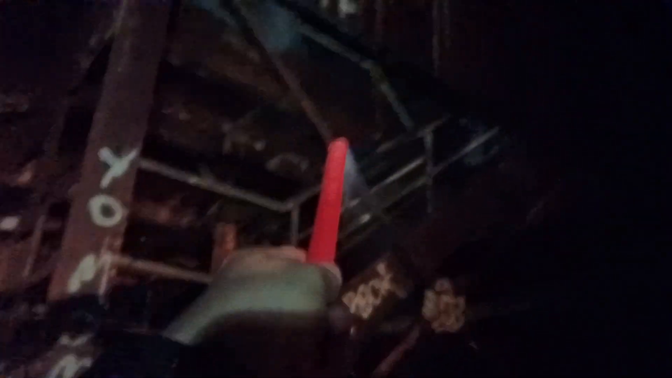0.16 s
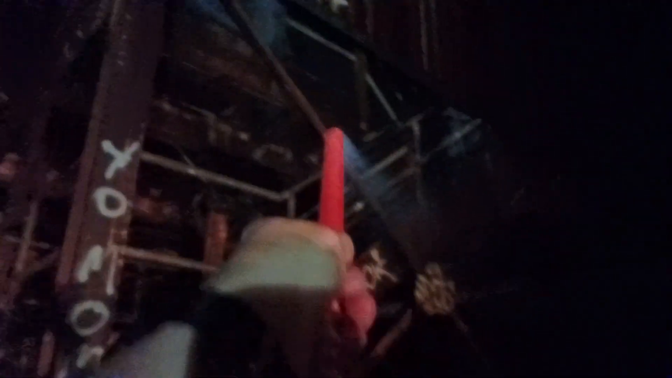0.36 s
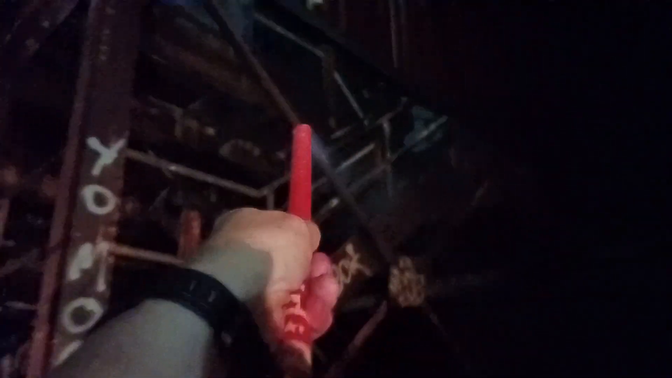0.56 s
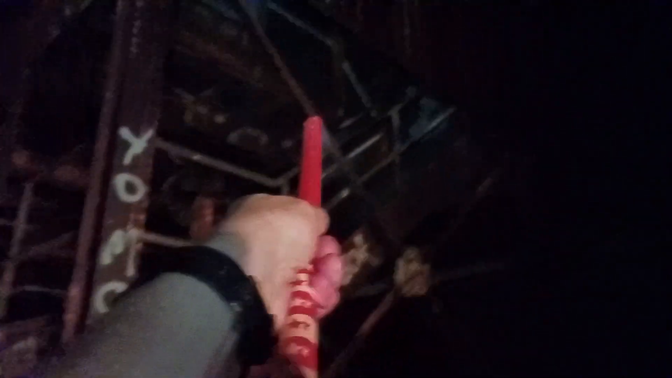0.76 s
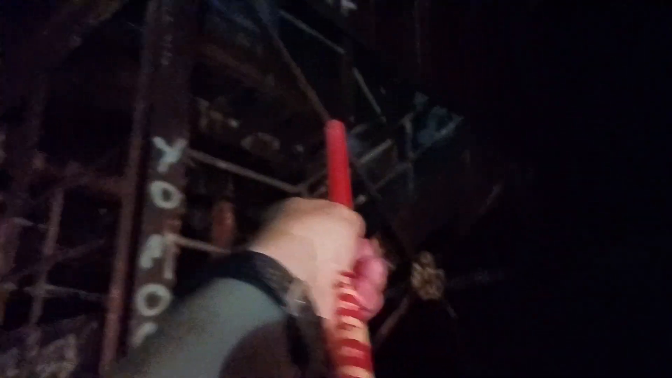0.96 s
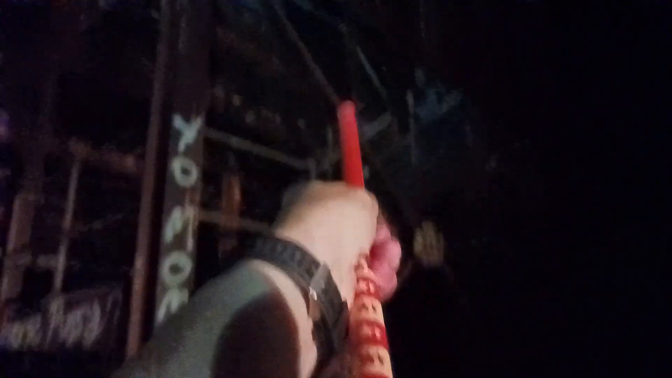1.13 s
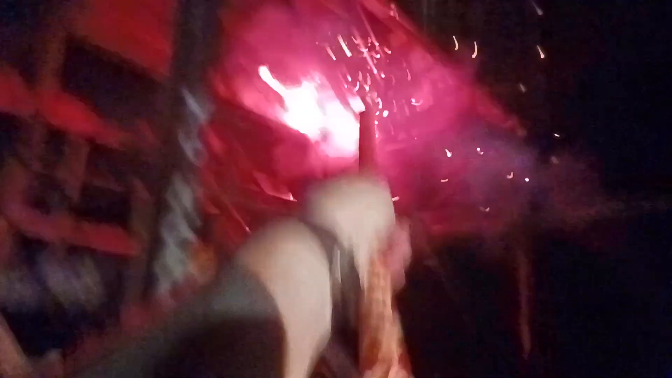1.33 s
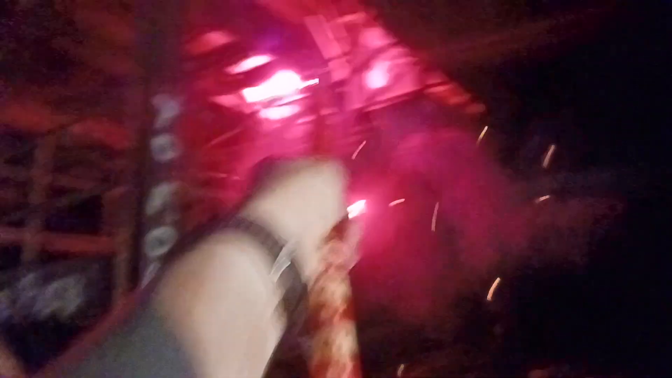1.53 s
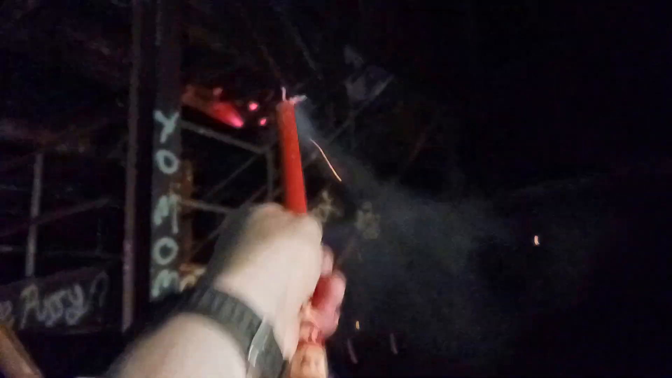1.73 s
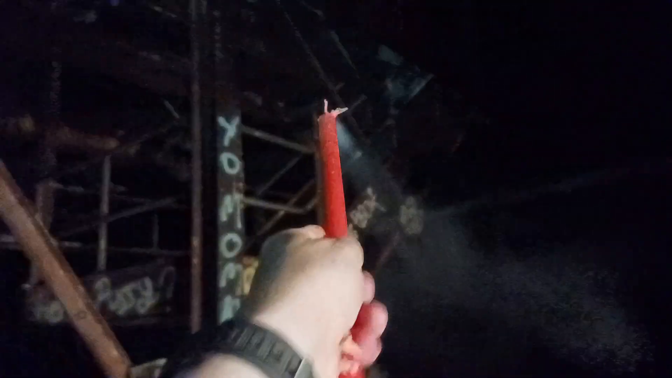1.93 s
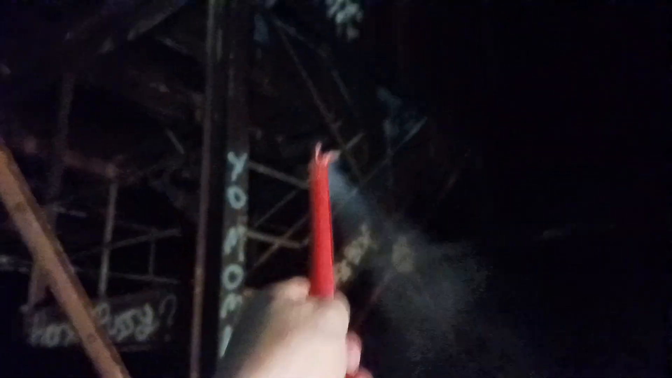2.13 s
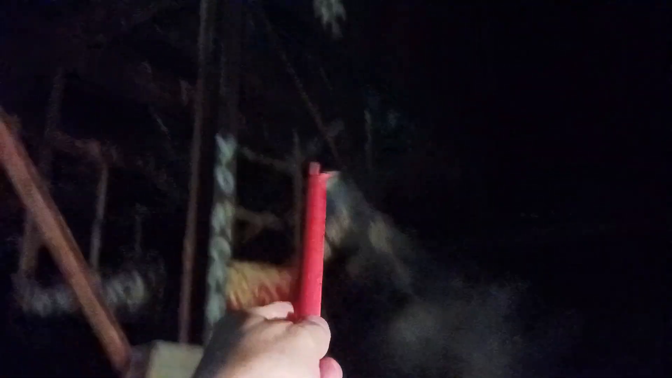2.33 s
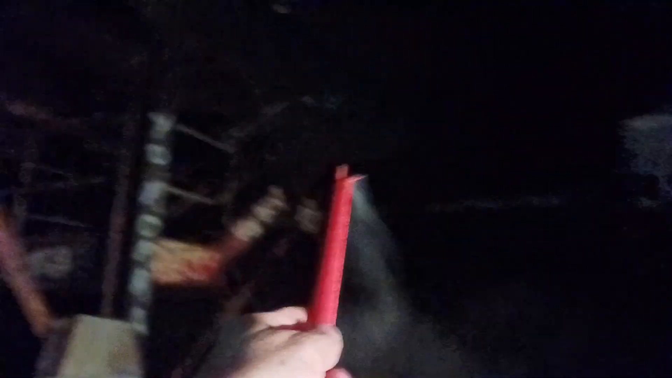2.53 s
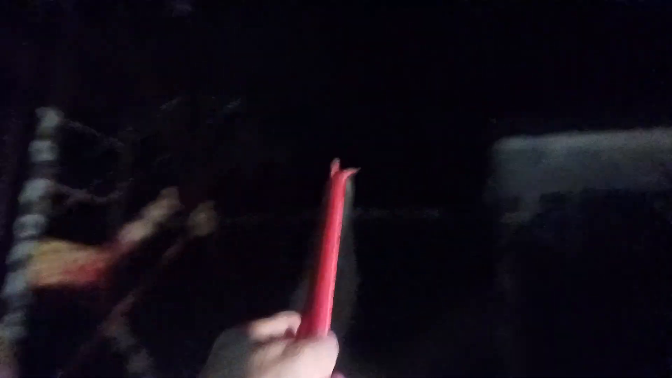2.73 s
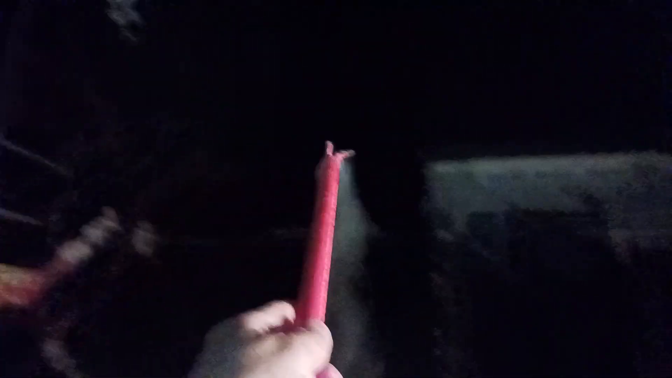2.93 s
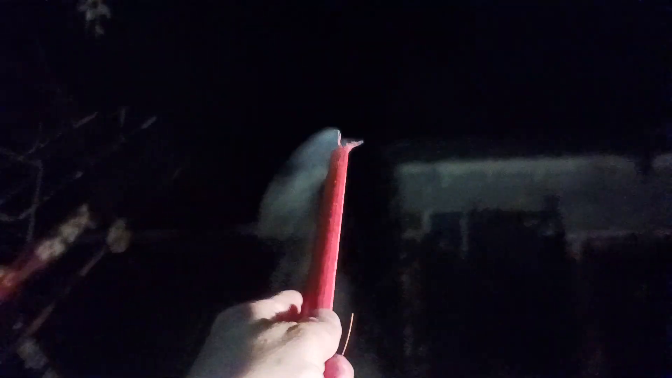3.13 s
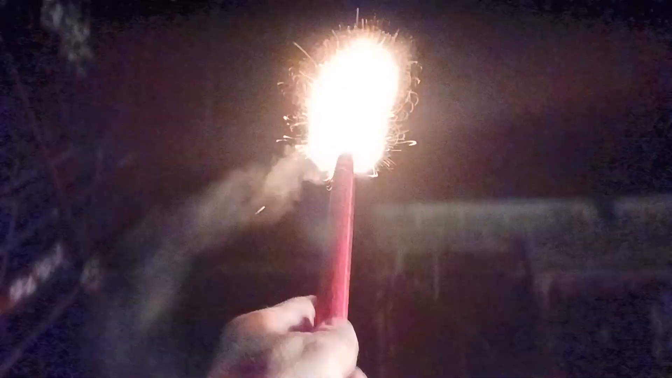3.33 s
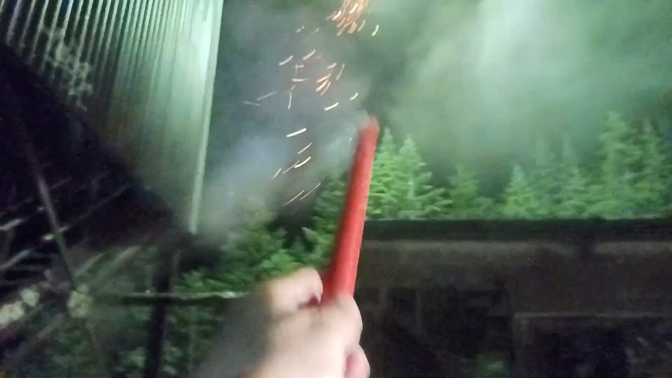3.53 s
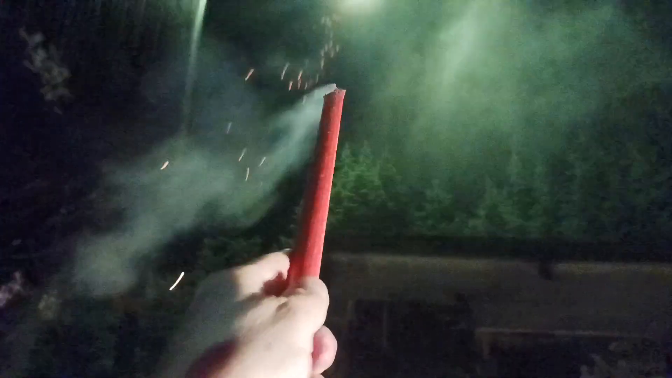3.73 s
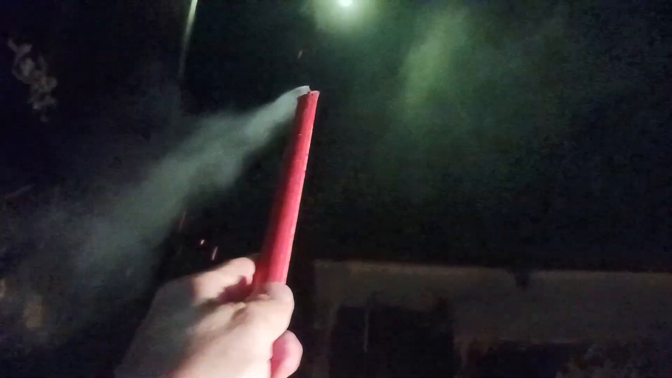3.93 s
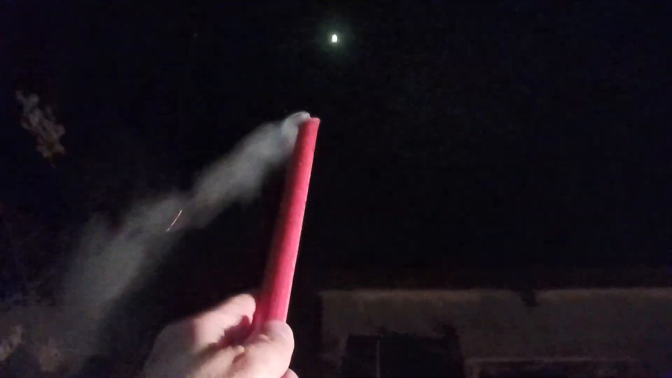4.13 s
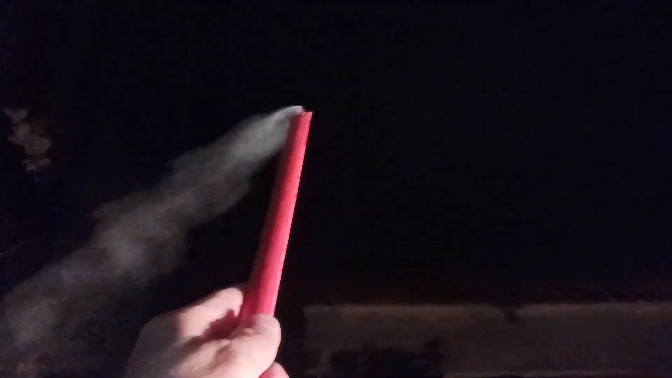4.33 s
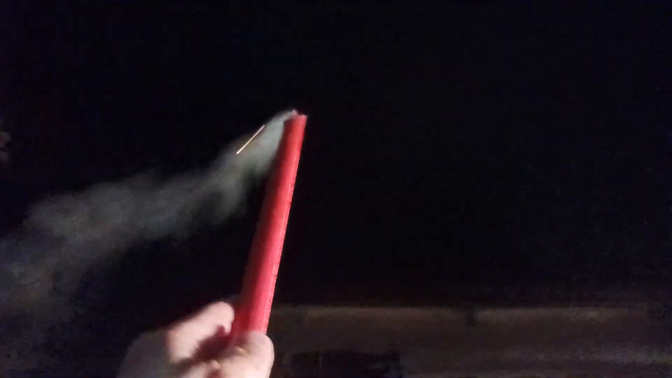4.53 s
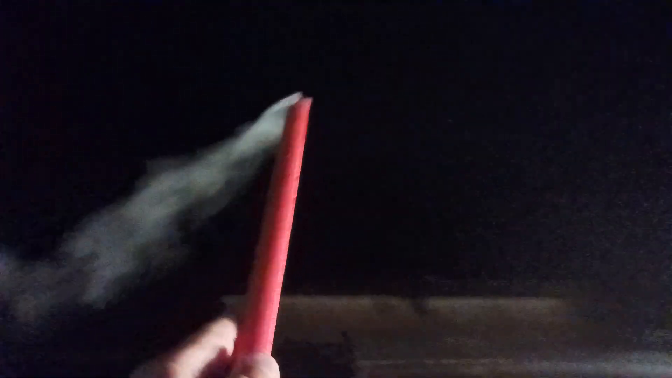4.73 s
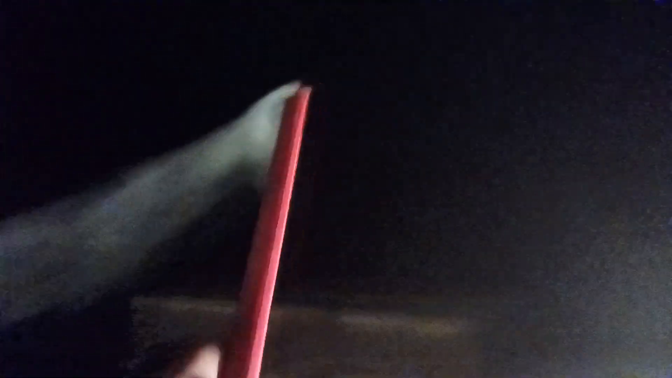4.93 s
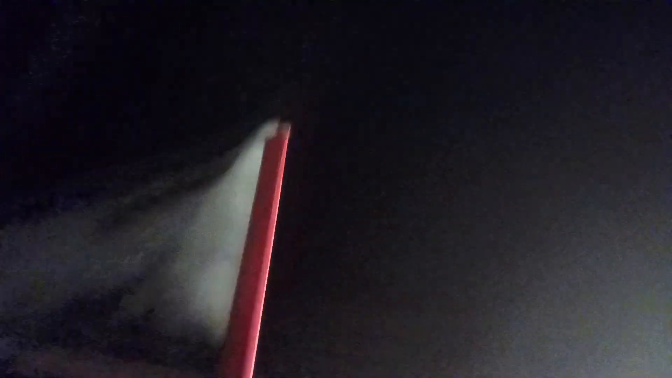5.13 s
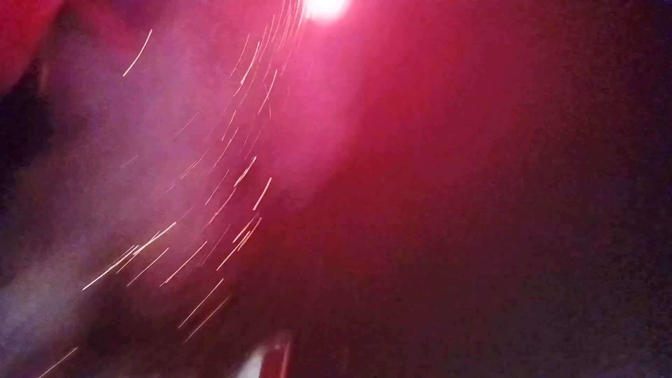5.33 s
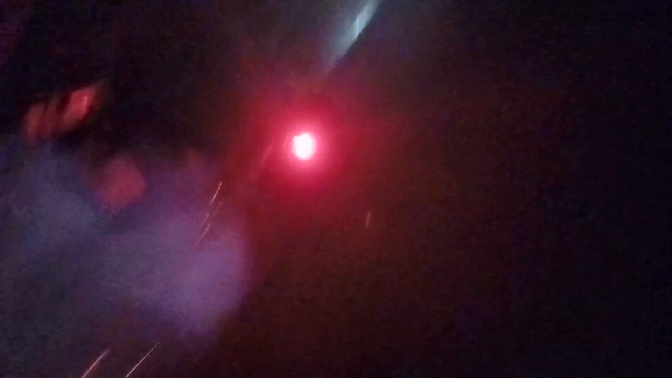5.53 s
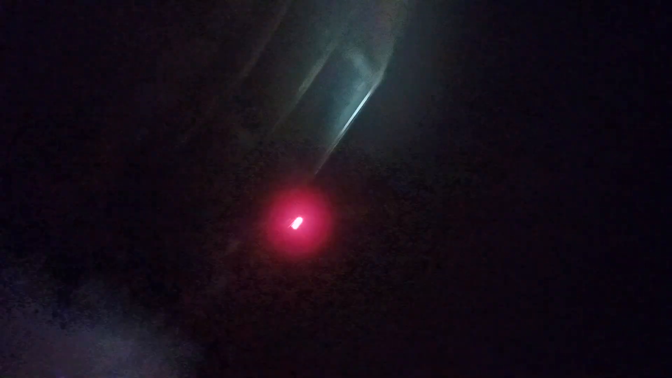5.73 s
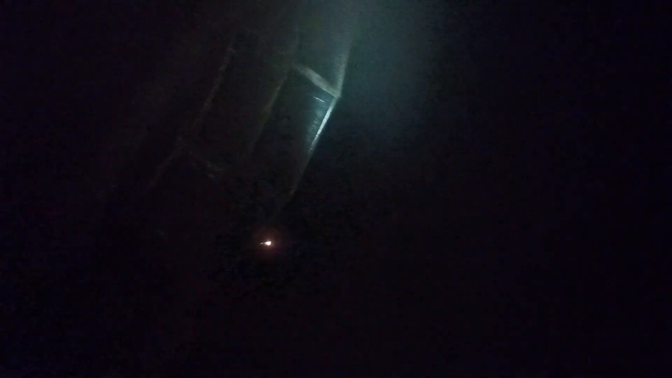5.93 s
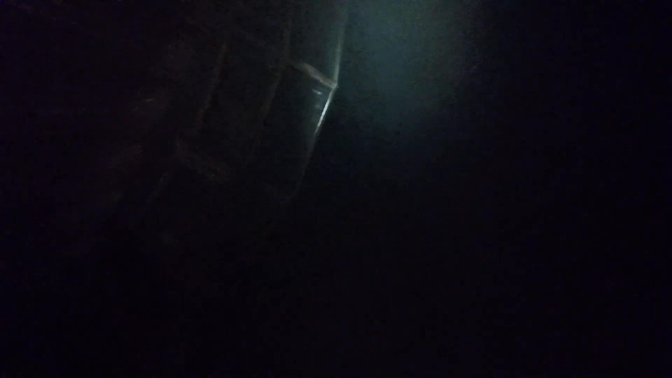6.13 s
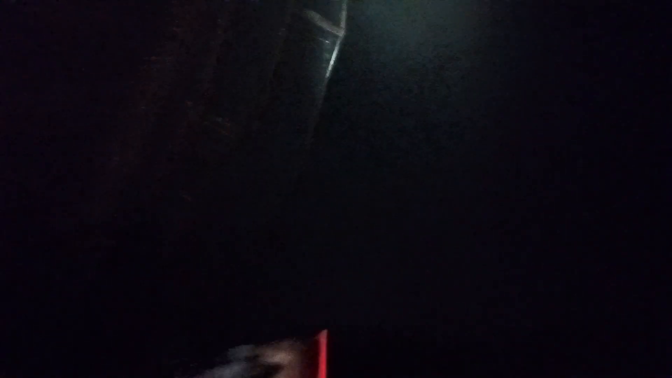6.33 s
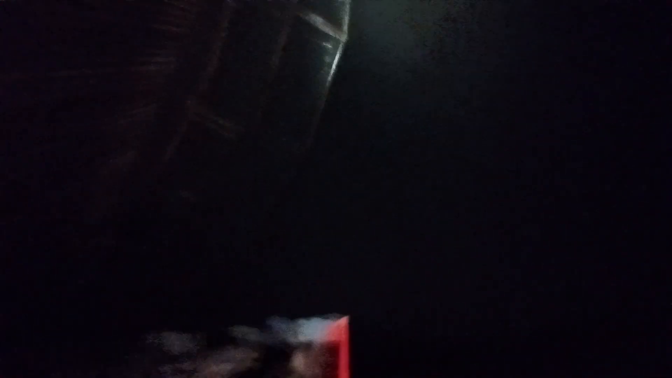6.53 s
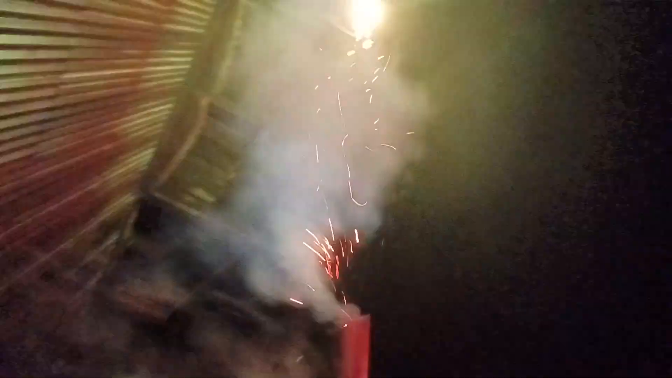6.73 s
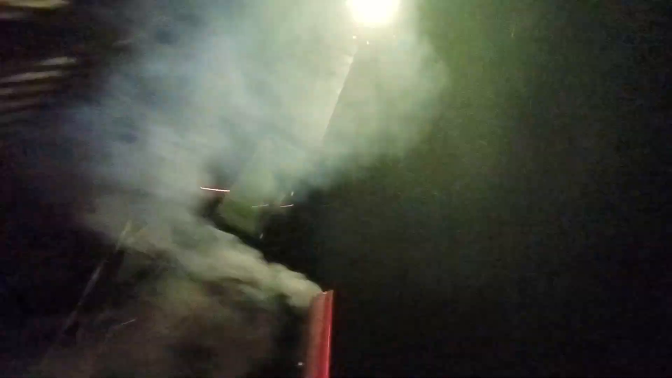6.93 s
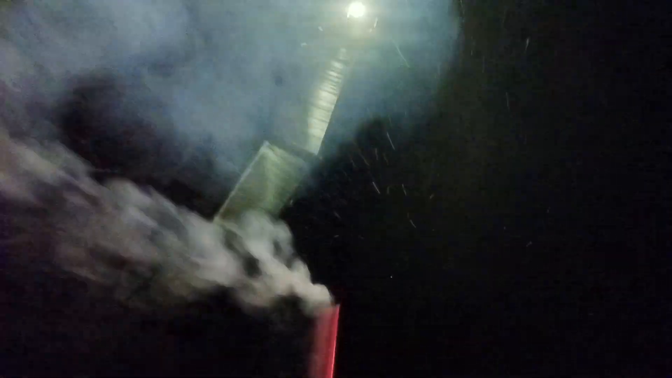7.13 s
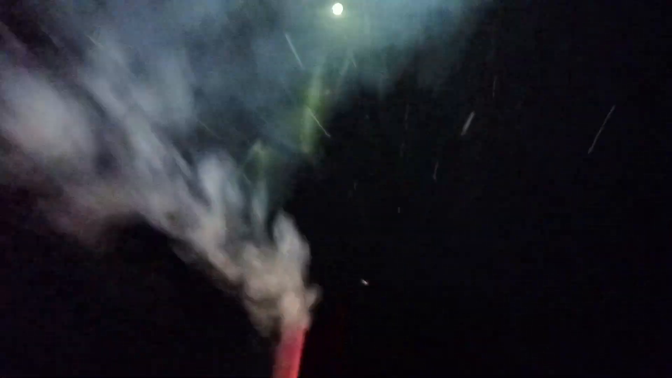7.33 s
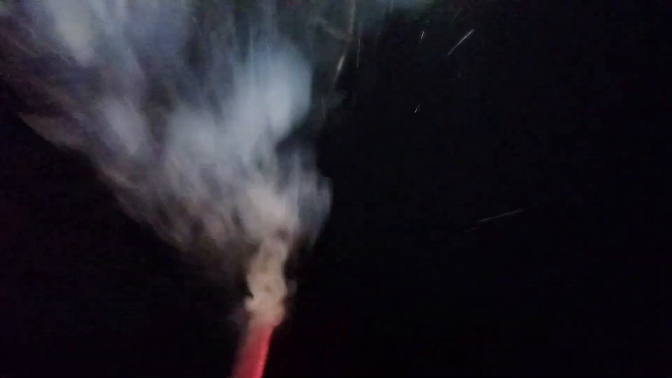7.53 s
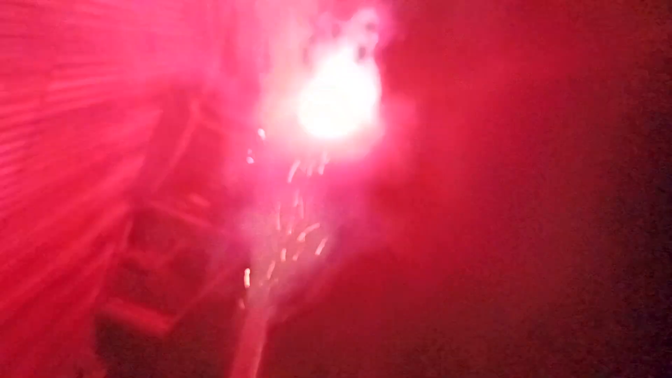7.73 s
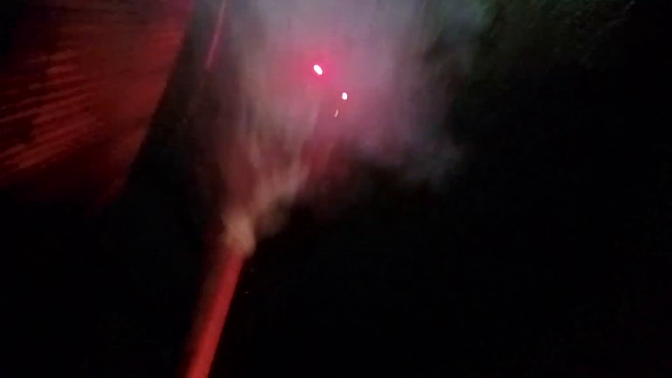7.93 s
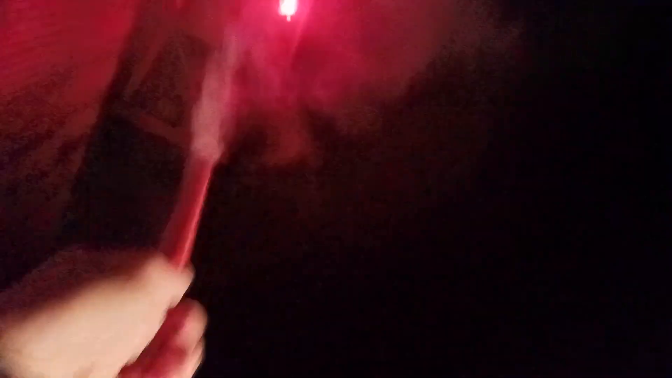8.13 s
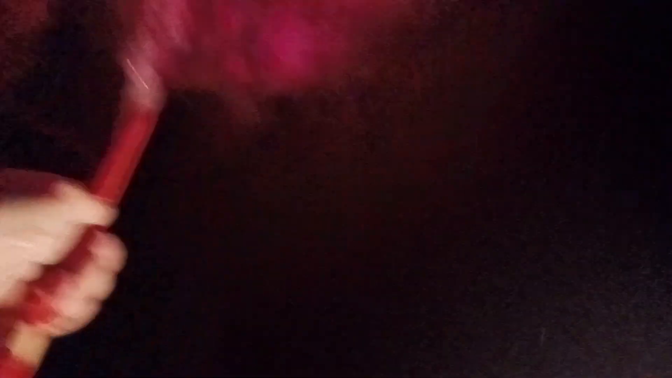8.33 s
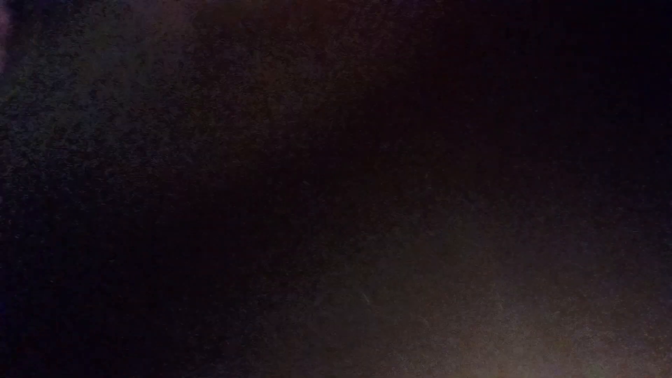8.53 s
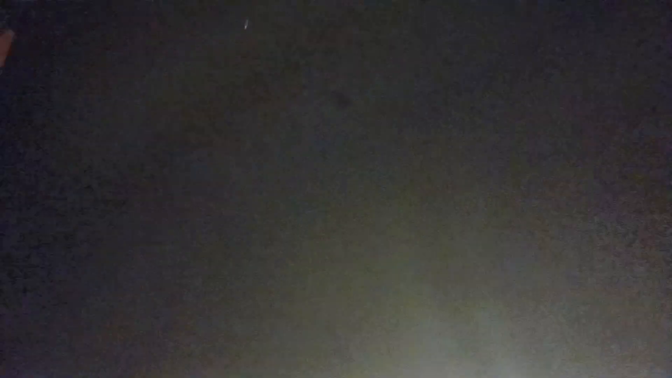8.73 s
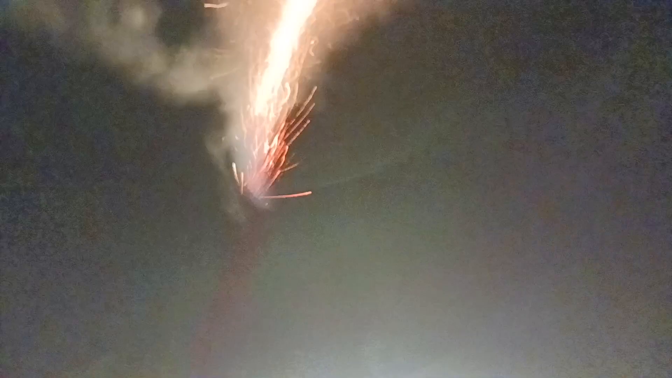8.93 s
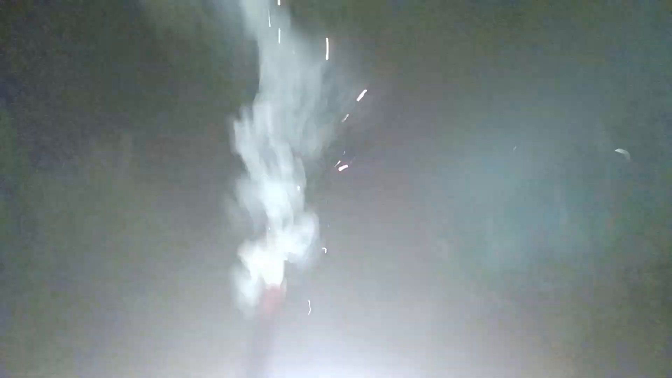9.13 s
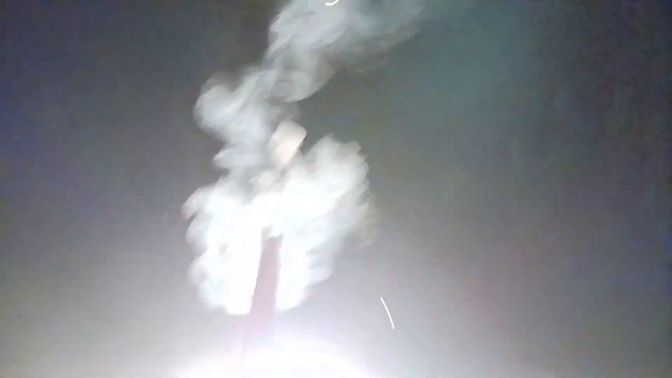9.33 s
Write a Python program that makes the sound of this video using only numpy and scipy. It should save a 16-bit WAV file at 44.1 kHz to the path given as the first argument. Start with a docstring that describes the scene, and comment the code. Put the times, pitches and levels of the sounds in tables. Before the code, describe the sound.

Six spaced firework shots crack and roar close by over fizzing fuse gas, with short boomy echoes and low wind rumble at the start.

```python
"""Wind buffets both microphone ports at first and dies down, over a faint machine hum in the night air.
Close by, a hand-held firework tube hisses fuse gas and fires six stars among steel frames and sheds.
Each shot is a snap and a noise roar; sheet walls throw it back as short puffs, a dying wash and a boom.
One star bursts nearby with a thin crack and a slap. Wind, hiss and hum are coloured noise, the hum with
one steady tone; a few scuffs and small metal knocks sit near the microphone."""
import sys
import numpy as np
from scipy import signal
from scipy.fft import rfft, irfft, next_fast_len
from scipy.io import wavfile
from scipy.ndimage import uniform_filter1d, map_coordinates

SR = 44100
rng = np.random.default_rng(int(sys.argv[2]) if len(sys.argv) > 2 else 0)


def master_out(mix):
    """Clip the mix to full scale and print it as 16-bit PCM to the path in sys.argv[1]."""
    frames = np.transpose(np.atleast_2d(mix))
    ceiling = np.clip(frames, -1, 1)
    pcm = np.round(ceiling * 32767).astype(np.int16)
    wavfile.write(sys.argv[1], SR, pcm)


N = 413658  # samples

# the tube's whine, far machinery's drone and hum: start_s, whine_db, drone_db, hum_db
NIGHT_LEVELS = [(0, -62, -57, -60), (.3, -57, -62, -65), (.5, -61, -63, -55.5), (1.1, -64, -64, -60),
                (1.22, -81, -64, -67), (3.35, -64.5, -74, -80), (5.2, -68.5, -79, -90),
                (6.6, -74.5, -70, -90), (7.6, -67, -62, -87), (8.9, -64.5, -57, -90), (9.4, -65, -60, -80)]
# noise bands of the whine, then of the low drone: pitch_hz, width_hz, level_db
NIGHT_TONES = [
    [(1112, 33, 1), (377, 31, -3), (187.3, 7.4, -4.5)],
    [(49.7, 6.6, 2.5)],
]
# wind pressing on the ports: start_s, strength_db
WIND_STRENGTH = [(0, -32.5), (.31, -29.5), (.53, -36.5), (.62, -25), (.75, -22.5), (.92, -24.5),
                 (1.04, -21), (1.17, -21.5), (1.2, -41), (1.24, -36), (1.5, -36), (1.73, -49),
                 (1.94, -44.5), (2.04, -42.5), (2.21, -47.5), (2.31, -39.5), (2.48, -45.5), (2.65, -37.5),
                 (2.84, -42.5), (3.1, -50.5), (3.38, -53.5), (3.55, -45.5), (3.75, -57.5), (4.19, -63),
                 (4.55, -75.5), (4.75, -68), (5.2, -59.5), (5.82, -70), (5.9, -89), (6.4, -80),
                 (6.6, -72.5), (8.0, -68), (9.38, -63)]
# single buffets on a port: start_s, peak_db, left_over_right_db, pitch_hz, rise_cycles
WIND_THUMPS = [(0.308, -26, 19, 79, 0.68), (0.583, -18, 14, 67.6, 0.94), (0.587, -30.5, 16, 227, 0.96),
               (0.668, -16, 1, 65, 0.89), (0.739, -20, -2, 71, 0.76), (0.768, -34, -4, 96, 0.84),
               (0.83, -30.5, -16, 163, 1), (0.89, -20, 10, 95, 0.73), (0.965, -18.5, -8, 60.4, 1.5),
               (0.984, -29.5, 20, 320, 0.55), (1.105, -17.5, -10.5, 114, 2), (1.137, -21, -5, 230, 0.7),
               (1.991, -42.5, -21, 128, 0.71), (2.036, -34, -2, 109, 0.82), (2.115, -36.5, -5, 69.4, 0.59),
               (2.323, -40.5, -18, 81, 1), (2.423, -40.5, -12, 280, .6), (2.506, -31, -4, 74, 0.47),
               (2.552, -29, -2, 73, 0.84), (2.63, -37, -11, 128, 1.1), (2.668, -37, -9, 63.6, 1.3),
               (2.765, -38, 2, 138, 1.2), (2.807, -40, 10, 181, 0.48), (2.945, -40, -13, 79, 0.65),
               (3.87, -46.5, 10, 64.6, 1.06)]
# colour of the wind's low pressure noise: pitch_hz, level_db (per Hz)
BUFFET_COLOUR = [(13, -47), (25, -19.5), (42, 3), (55, 0), (75, -3), (110, -6.5), (150, -10), (200, -21),
                 (400, -80)]
# colour of the wind's sharper edge: pitch_hz, level_db (per Hz)
EDGE_COLOUR = [(120, -23.5), (180, -7.5), (300, -15), (450, -23), (800, -36), (1200, -120)]
# fuse gas leaving the tube: start_s, level_db, treble_db, body_db
FUSE_LEVELS = [(0, -56.5, 0.5, 14.5), (.56, -55.5, -0.5, 14), (.6, -53.5, 1, 19.5), (.76, -59, -1.5, 14),
               (1.05, -54.5, 2, 12), (1.23, -60.5, 3.5, 12.5), (1.8, -59.5, 0.5, 4), (2.48, -63.5, -0.5, 2),
               (2.73, -51.5, -1, -0.5), (3.01, -50, -6, 4.5), (3.15, -55.5, 0, 8), (3.37, -53.5, -9, 3.5),
               (3.9, -59.5, -2, 2), (4.08, -58.5, 2.5, 1.5), (4.33, -61, 2, 1.5), (4.55, -60, 3, 1),
               (4.74, -58, 2, 4.5), (5.05, -53.5, -1.5, 4), (5.2, -56, -3, 4.5), (5.6, -58, -2.5, 4),
               (5.9, -61.5, -1.5, 1), (6.36, -62, 2.5, 1), (6.57, -57, -6, 3), (7.13, -59.5, -5, 2.5),
               (7.4, -63, -1, 4.5), (7.65, -66.5, -1, 3), (8.2, -62, -1, 1.5), (8.45, -58.5, -2.5, 2),
               (8.6, -65.5, 5, 7.5), (8.87, -64, -3, 8), (8.93, -60.5, -5, 5.5)]
# the muzzle swings across the ports: start_s, right_late_ms, likeness (0-1)
MUZZLE_AIM = [(0, 0.086, 0.2), (1.2, 0.092, 0.07), (2, 0.093, 0.45), (3, 0.074, 0.42), (4, 0.1, 0.7),
              (5, 0.14, 0.54), (6, 0.1, 0.72), (7, 0.078, 0.4), (7.5, 0.12, 0.56), (8.2, 0.17, 1),
              (8.8, 0.37, 0), (9.4, 0.088, .35)]
# colour of the gas jet: pitch_hz, level_db (per Hz)
JET_COLOUR = [(150, -27), (250, -7.5), (640, -16), (850, -17), (1120, -11.5), (1600, -13), (2000, -15),
              (2900, -9.5), (4300, -9), (6100, -12.5), (8000, -13.5), (10500, -18), (15600, -20),
              (15800, -66)]
# stereo balance of the jet: pitch_hz, left_over_right_db
JET_BALANCE = [(60, 5), (110, -5), (200, 6), (380, 4.5), (700, 7.5), (1290, -2.5), (2380, 3.5), (4400, 0),
               (7000, 2), (8800, 7), (10200, 6.5), (15000, 4)]
# bands of the hiss shift as the tube turns: start_s, lower_hz, upper_hz, lift_db (of both), top_hz, top_db
JET_BANDS = [(0, 2260, 4370, 3, 7200, -2), (1.2, 2400, 4400, 2, 7040, -1), (1.9, 3130, 4770, 4, 7130, 6.5),
             (3.3, 2980, 4300, 3, 7170, 1.5), (3.9, 2300, 4050, 5.5, 7100, 5),
             (5.2, 2235, 4000, 3, 6760, 5), (5.8, 3240, 4450, 3, 7700, 1.5),
             (6.6, 3070, 4500, 1, 7600, 6.5), (7.3, 3100, 4350, 3.5, 7200, 1.5),
             (8.6, 3040, 4000, -0.5, 6800, 4)]
# shoes or sleeve scuffing close by: start_s, level_db, low_db, left_over_right_db, treble_db
SCUFFS = [(0.2814, -55, 12.5, 2, 3), (0.4244, -33, -4, 9, 5), (0.5527, -55, 23, -6, -3),
          (0.5774, -49, 2.5, 21, -1), (0.6003, -39, 8, 0, 2), (0.6357, -44, 7, 1, -0.5),
          (3.2095, -58, -3.5, -8.5, -1.5), (3.2604, -46, 12, 1, 1)]
# small metal knocks: start_s, level_db, pitch_hz, t60_s
METAL_TICKS = [(0.5552, -30, 1130, 0.023), (0.6366, -36, 1680, 0.046)]
# shots: start_s, level_db, blast_s, lead_db, lead_s, snap_db, shove_db, bounce_db, bounce_late_s,
# bass_db, treble_db, right_late_ms, band_hz (lifted or dulled), band_db
SHOTS = [(1.251, -5.5, 0.007, -41, 0.01, 6.5, -17, -11, 0.013, 5.5, -6, 0.067, 870, -8),
         (3.4093, -8.5, 0.0099, -25, 0.0088, 9.5, -19.5, -17, .0128, 6, -4.5, 0.073, 1600, 2.5),
         (5.247, -11, 0.0059, -8, 0.0096, 13, -17, -13.5, 0.013, 7.5, -5.5, 0.089, 800, -5),
         (6.663, -8.5, 0.014, -7, 0.0064, -6, -34, -22, .022, 4, -5, 0.052, 2330, -8),
         (7.687, -11, 0.01, -14, 0.0068, -16, -26.5, -24, 0.017, 7.5, 0, 0.11, 2460, 10),
         (8.9663, -7, 0.011, -18, 0.0054, -5, -20.5, -18.5, 0.017, 1, -3, 0.14, 773, -3)]
# colour of the blast: pitch_hz, level_db (per Hz)
BLAST_COLOUR = [(88, -35.5), (150, -8.5), (1290, 4), (1950, -2.5), (2960, 0.5), (6140, -0.5), (6770, 1),
                (8930, -7.5), (13000, 0), (15500, -10.5), (16800, -35.5)]
# how the yard answers: start_s, level_db, swell_s, t60_factor, bass_db, treble_db, ring_hz, ring_db, boom_db
YARD_ANSWERS = [(1.2508, -11.5, 0.041, 1.005, -2, 2, 4500, 6, -20),
                (3.4084, -17.5, 0.024, 0.94, 6, -1, 4170, 11.5, -29),
                (5.247, -15.5, 0.029, 0.9, 0, -4.5, 1100, 3, -26),
                (6.662, -25, 0.02, 0.92, 9, 0, 4200, 3.5, -38.5),
                (7.687, -24, 0.024, 0.97, 6.5, -0.5, 5500, 1.5, -38.5),
                (7.923, -27, 0.0014, 1.35, -19, -3, 3800, 0.5, -75),
                (8.9675, -21, 0.03, 1.046, -1, -0.5, 2000, 13, -31.5)]
# colour of the yard's wash: pitch_hz, level_db (per Hz)
YARD_COLOUR = [(150, -26.5), (300, -7), (450, -9), (625, -6.5), (790, -14), (1200, -9.5), (2000, -8),
               (3000, -10.5), (4500, -7), (7000, -10), (9000, -16), (12000, -11), (15650, -16),
               (15800, -74.5)]
# decay of the yard before each answer's factor: pitch_hz, t60_s
YARD_T60 = [(60, 1), (250, 0.51), (1000, 0.64), (3000, 0.56), (8000, 0.45), (14000, 0.37)]
# left-right likeness of the yard: pitch_hz, likeness (0-1)
YARD_ALIKE = [(60, 0.88), (300, 1), (700, 0.0093), (1500, 0), (3000, 0), (15000, 0)]
# colour of the sheet walls drumming: pitch_hz, level_db (per Hz)
BOOM_COLOUR = [(25, -28), (50, -2.5), (90, -0.5), (135, -4), (200, -9.5), (300, -18), (500, -53.5)]
# walls and frames throwing a shot back: start_s, level_db, low_db, left_over_right_db, treble_db
ECHOES = [(1.3091, -8, 5.5, -8, -14), (1.3178, -14, -12, 8, -3), (1.3944, -14.5, -22, 5.5, -6),
          (3.4334, -22.5, -28, 1, 7.5), (3.4464, -18, -9.5, 5.5, 2), (3.4727, -6.5, -13.5, -2, -5.5),
          (3.5024, -28, 16, 2, 0), (5.2924, -15, 7.5, 3, 0), (5.3149, -25, 20.5, -9, -5),
          (5.3239, -20.5, 14, -2, -2), (6.6715, -18.5, -15.5, -6, -4), (6.7119, -19.5, 0, 2, -1),
          (6.7384, -30.5, 17, -1, -7), (7.7303, -20.5, -9, 5, 0), (7.7544, -27.5, 10.5, -1, -7),
          (7.995, -31, -13, -7, -5), (9.0145, -17.5, -10.5, 11, -4), (9.0362, -11, 2.5, -5, -5.5)]
# the bursting star, one row: crack_db, slap_db, slap_t60_s, slap_hz, right_late_ms
STAR_BURST = (-3.5, -12, 0.04, 3796, 1.6)

HUM_HZ, HUM_RISES = 599, 3  # pitch at the start; Hz a second
SAG_DB, RECOVER_S = 14, 1.21  # these tones dip after each shot and creep back
CALM_DB, STRONG_DB = -62.5, -52.5  # wind strength: below, a smooth rumble; above, fully lumpy
LUMP_DB, LULL_DB, LULLS_PER_S = 3, 2.5, 9  # fast lumps and slower lulls, each port its own
CALM_LEFT_DB = 8  # left over right in the calm rumble
EDGE_DB, EDGE_GROWS = -51, 0.82  # edge at a strength of -35.5 dB; dB gained for each dB of wind
PORT_TURN = 0.67  # a buffet's swing is turned this far each way at the two ports (radians)
BAND_WIDE_HZ, TOP_WIDE_HZ = 240, 650
DIP_ABOVE, DIP_DB, DIP_WIDE_HZ = 1.226, -7.5, 618  # dip above the top band, as a ratio of its pitch
ROAR_DB = -8  # the roar against a shot's level
BOOM_T60_S = 0.56
BURST_S, SLAP_S = 7.9192, 0.0036  # crack; delay of its slap
RATTLE_DB = -25.5  # between crack and slap, against the slap
TOP_HZ = 16900  # band limit
HOP = 128  # samples between short-time spectra


def amp(db):
    """Gain of a level in dB."""
    return 10 ** (np.asarray(db) / 20)


def unit(x):
    """Scaled to rms 1."""
    return x / np.sqrt(np.mean(np.abs(x) ** 2) + 1e-20)


def along(points, hz):
    """(Hz, value) points read on a log pitch axis."""
    point_hz, value = np.transpose(points)
    return np.interp(np.log(hz + 1), np.log(point_hz + 1), value)


def curves(rows, t):
    """Each column after the time, read at times t."""
    s, *columns = np.transpose(rows)
    return [np.interp(t, s, column) for column in columns]


def wobble(rate):
    """A smooth random curve, rate knots a second."""
    knots = rng.standard_normal(int(N * rate / SR) + 4)
    return map_coordinates(knots, [np.arange(N) * rate / SR])


def patches(shape, wide, long):
    """A random field of rms 1, smooth over wide bins and long frames."""
    field = uniform_filter1d(rng.standard_normal(shape), wide, 0)
    return unit(uniform_filter1d(field, long, 1))


def filtered(x, response):
    """x times a response of frequency, padded against wrap-around."""
    size = next_fast_len(x.shape[-1] + 8192)
    spectrum = rfft(x, size) * response(np.fft.rfftfreq(size, 1 / SR))
    return irfft(spectrum, size)[..., :x.shape[-1]]


def hiss(colour, size):
    """Noise of rms 1 with a given colour."""
    return unit(filtered(rng.standard_normal(size), lambda hz: amp(along(colour, hz))))


def tilt(hz, bass_db, treble_db):
    """A bass shelf and a rising treble slope that levels off, in dB."""
    bass = bass_db * np.clip(np.log2(1500 / (hz + 1)) / 3, 0, 1)
    return bass + treble_db * np.clip(np.log2((hz + 1) / 5000), 0, 1)


def pair(size, alike):
    """Frequencies, times and short-time spectra of two noises with likeness alike(hz, t)."""
    hz, t, z = signal.stft(rng.standard_normal((2, size)), SR, nperseg=2 * HOP)
    turn = np.arccos(np.clip(alike(hz[:, None], t), -1, 1)) / 2
    mid, side = z[0] * np.cos(turn), z[1] * np.sin(turn)
    return hz[:, None], t, np.array([mid + side, mid - side])


def pan(db):
    """Half of a left-right level difference to each side."""
    return amp(np.array([db / 2, -db / 2]))


def ports(x, late_ms):
    """The same sound at both ports, later at the right one."""
    late_s = np.array([[0], [late_ms / 1000]])
    return filtered(np.array([x, x]), lambda hz: np.exp(-2j * np.pi * hz * late_s))


def kick(t, width):
    """A pressure jump and the suction after it."""
    u = np.maximum(t, 0) / width
    return (t >= 0) * (1 - u) * np.exp(-u)


def add(out, s, sound):
    """Mixes a stereo sound in from time s."""
    part = out[:, round(s * SR):][:, :sound.shape[1]]
    part += sound[:, :part.shape[1]]


def puffs(table, colour, split_hz, rise, t60):
    """Short dying bursts of noise, with a low part of their own under split_hz."""
    out, t = np.zeros((2, N)), np.arange(SR // 8) / SR
    for s, db, low_db, side_db, treble_db in table:
        low_and_treble = lambda hz: amp(low_db / (1 + (hz / split_hz) ** 4) + tilt(hz, 0, treble_db))
        a, b = filtered(hiss(colour, (2, len(t))), low_and_treble)
        shape = (1 - np.exp(-(t / rise) ** 2)) * amp(db - 60 * t / t60)
        stereo = np.array([a + 1.37 * b, a - 0.5 * b])
        add(out, s - rise / 2, shape * pan(side_db)[:, None] * stereo)
    return out


def wind():
    """Eddies press on each port apart; strong ones come in lumps and lulls and carry a sharper edge."""
    level_db, = curves(WIND_STRENGTH, np.arange(N) / SR)
    strength = np.clip((level_db - CALM_DB) / (STRONG_DB - CALM_DB), 0, 1)
    lumps = amp(LUMP_DB * strength * np.array([wobble(29.78), wobble(29.67)]))
    lulls = amp(LULL_DB * strength * np.array([wobble(LULLS_PER_S), wobble(LULLS_PER_S)]))
    low = amp(level_db) * unit(lumps * hiss(BUFFET_COLOUR, (2, N)))
    edge_db = EDGE_DB + EDGE_GROWS * (level_db + 35.5)
    edge = amp(edge_db) * unit(lumps ** 1.57 * hiss(EDGE_COLOUR, (2, N)))
    out = lulls * pan(CALM_LEFT_DB * (1 - strength)) * (low + edge)
    t = np.arange(SR // 5) / SR
    port_phase = PORT_TURN * np.array([[1], [-1]])
    for s, db, side_db, hz, cycles in WIND_THUMPS:
        rise = t * hz / cycles  # reaches 1 at the envelope's peak
        push = np.sin(2 * np.pi * hz * t + port_phase) * rise * np.exp(1 - rise)
        add(out, s - .004, amp(db) * pan(side_db)[:, None] * push)
    return out


def night():
    """The firework tube whines with the fuse gas; far machinery drones and hums: narrow bands of noise and one
    slowly rising tone; all dip after each shot."""
    t = np.arange(N) / SR
    since = t - np.array([shot[0] for shot in SHOTS])[:, None]
    sag_db = SAG_DB * np.max((since > 0) * np.exp(-(since / RECOVER_S) ** 2), axis=0)
    *band_levels, hum_db = curves(NIGHT_LEVELS, t)
    hum_phase = 2 * np.pi * (HUM_HZ + HUM_RISES * t / 2) * t + .5 * wobble(5.5)
    hum = np.sqrt(2) * np.sin(hum_phase)
    out = amp(hum_db + 1.1 * wobble(14)) * np.array([hum, hum])
    for level_db, tones in zip(band_levels, NIGHT_TONES):
        for centre_hz, width_hz, db in tones:
            resonance = lambda hz: 1 / (1 + ((hz - centre_hz) / width_hz * 2) ** 2)
            a, b = filtered(rng.standard_normal((2, N)), resonance)
            out += amp(db + level_db) * unit(np.array([a + 0.74 * b, a - 0.27 * b]))
    return out * amp(-sag_db)


def fuse():
    """A sputtering gas jet, noise with moving bands, that reaches the left port first."""
    hz, t, z = pair(N, lambda hz, t: curves(MUZZLE_AIM, t)[1] + 0 * hz)
    level_db, treble_db, body_db = curves(FUSE_LEVELS, t)
    colour = along(JET_COLOUR, hz) + treble_db * np.clip(np.log2(hz / 6000 + 1e-9), 0, 1)
    colour = colour + body_db * np.clip(np.log2(3000 / (hz + 1)), 0, 1)

    lower_hz, upper_hz, lift_db, top_hz, top_db = curves(JET_BANDS, t)
    bump = lambda centre_hz, wide_hz: np.exp(-((hz - centre_hz) / wide_hz) ** 2)
    colour = colour + lift_db * (bump(lower_hz, BAND_WIDE_HZ) + bump(upper_hz, BAND_WIDE_HZ))
    colour = colour + top_db * bump(top_hz, TOP_WIDE_HZ)
    colour = colour + DIP_DB * bump(DIP_ABOVE * top_hz, DIP_WIDE_HZ)

    # the level refers to the jet's power between 2.5 and 8 kHz
    band = (hz[:, 0] > 2500) & (hz[:, 0] < 8000)
    norm = np.sqrt(np.sum(amp(along(JET_COLOUR, hz[band])) ** 2) / len(hz))
    gain = amp(colour + level_db + 0.89 * patches(z.shape[1:], wide=4, long=36)) / norm
    # half of the delay between the ports goes to each side
    early = np.exp(1j * np.pi * hz * curves(MUZZLE_AIM, t)[0] / 1000)
    spectra = z * gain * pan(along(JET_BALANCE, hz)) * [early, 1 / early]
    jet = signal.istft(spectra, nperseg=2 * HOP)[1][:, :N]
    return jet * amp(0.46 * wobble(8.7) + 0.24 * wobble(60))


def scuffs():
    """Shoes or sleeve rub close by: soft-edged puffs of bright noise."""
    return puffs(SCUFFS, JET_COLOUR, split_hz=4300, rise=0.011, t60=0.071)


def ticks():
    """Small metal knocks: one dull decaying ring each, centred between the ports."""
    out, t = np.zeros((2, N)), np.arange(SR // 8) / SR
    for s, db, hz, t60 in METAL_TICKS:
        envelope = amp(db - 60 * t / t60) * (1 - np.exp(-t / 0.0014))
        ring = envelope * np.sin(2 * np.pi * hz * t)
        add(out, s, np.array([ring, ring]))
    return out


def shots():
    """Gas leaks past the star, the muzzle snaps, the charge roars and stops short; the ground sends it back."""
    out, before = np.zeros((2, N)), .05  # seconds kept ahead of the snap
    t = np.arange(SR // 6) / SR - before
    for (s, db, blast_s, lead_db, lead_s, snap_db, shove_db, bounce_db, bounce_late_s,
         bass_db, treble_db, late_ms, band_hz, band_db) in SHOTS:
        band = lambda hz: band_db * np.exp(-(np.log((hz + 1) / band_hz) / 0.11) ** 2)
        colour = lambda hz: amp(tilt(hz, bass_db, treble_db) + band(hz))
        a, b, c = filtered(hiss(BLAST_COLOUR, (3, len(t))), colour)
        # the powder burns unevenly
        sputter = amp(2.85 * hiss([(100, -6.5), (900, -1.5), (2000, -48.5)], len(t)))
        leak = amp(lead_db) / (1 + (np.abs(t) / lead_s) ** 4)
        charge = 1 / (1 + (np.abs(t) / blast_s) ** 10)
        roar = amp(db + ROAR_DB) * sputter * np.where(t < 0, leak, charge)
        snap = amp(db + snap_db) * kick(t, .0001)
        direct = ports(roar * a + snap, late_ms) + 1.27 * roar * [b, c]
        late = t - bounce_late_s
        bounce = -amp(bounce_db) * np.sin(np.pi * late / .0008 + .6) * np.exp(-(late / .0007) ** 2)
        # the low push of air
        shove = amp(shove_db) * np.sin(2 * np.pi * 52 * late) * np.exp(-((late - .004) / 0.01) ** 2)
        add(out, s - before, direct + bounce + shove)
    return out


def yard():
    """Echoes pile up, then die band by band; the first ones ring with the nearest wall."""
    out = np.zeros((2, N))
    for s, db, swell_s, stretch, bass_db, treble_db, ring_hz, ring_db, _ in YARD_ANSWERS:
        hz, after, z = pair(SR, lambda hz, t: along(YARD_ALIKE, hz) + 0 * t)
        ring = ring_db * np.exp(-(np.log((hz + 1) / ring_hz) / 0.15) ** 2 - after / 0.097)
        uneven_walls = 2.57 * patches(z.shape[1:], wide=3, long=3)
        lingering_bands = 2.1 * patches(z.shape[1:], wide=2, long=30)
        wash_db = along(YARD_COLOUR, hz)
        colour = amp(wash_db + tilt(hz, bass_db, treble_db) + ring + uneven_walls + lingering_bands)
        colour = colour / np.sqrt(np.mean(amp(wash_db) ** 2))
        fade = amp(db - 60 * after / (stretch * along(YARD_T60, hz))) * (1 - np.exp(-after / swell_s))
        add(out, s, signal.istft(z * colour * fade, nperseg=2 * HOP)[1])
    return out


def booms():
    """The sheet walls drum: bass noise rolls on between them with each answer of the yard."""
    out, t = np.zeros((2, N)), np.arange(SR // 2) / SR
    for s, *_, db in YARD_ANSWERS:
        a, b = hiss(BOOM_COLOUR, (2, len(t)))
        envelope = amp(db - 60 * t / BOOM_T60_S) * (1 - np.exp(-(t / 0.0022) ** 2))
        add(out, s, envelope * [a + 0.5 * b, a - 0.094 * b])
    return out


def echoes():
    """Single walls and frames throw a shot back: brief puffs in the colour of the blast."""
    return puffs(ECHOES, BLAST_COLOUR, split_hz=2160, rise=0.0037, t60=0.033)


def burst():
    """A star's thin crack from the air, then its slap off the nearest sheet wall."""
    crack_db, slap_db, t60, slap_hz, late_ms = STAR_BURST
    t = np.arange(SR // 10) / SR - .01
    colour = [(300, -34), (900, -18), (slap_hz / 2, -12), (slap_hz, 0), (slap_hz * 2, -8),
              (15500, -20), (16900, -50)]
    noise = hiss(colour, (3, len(t)))
    onset = np.where(t > SLAP_S, 1, (t > 0) * amp(RATTLE_DB))
    slap = onset * amp(slap_db - 60 * np.maximum(t - SLAP_S - .002, 0) / t60)
    crack = amp(crack_db) * (kick(t + .0001, .00012) - 1.2 * kick(t, .0002))
    out = np.zeros((2, N))
    add(out, BURST_S + t[0], ports(slap * noise[0] + crack, late_ms) + .5 * slap * noise[1:])
    return out


def scene():
    """Everything that reaches the two ports."""
    background = wind() + night() + fuse()
    close_by = scuffs() + ticks()
    return background + close_by + shots() + yard() + booms() + echoes() + burst()


def record(dry):
    """The microphone drops the deep bass; peaks round off near full scale; nothing passes the band limit."""
    lean = signal.sosfilt(signal.butter(2, 45, "highpass", fs=SR, output="sos"), dry)
    soft = lean / (1 + np.abs(lean / .9) ** 6) ** (1 / 6)
    return filtered(soft, lambda hz: hz < TOP_HZ)


dry = scene()
out = record(dry)
master_out(out)
```